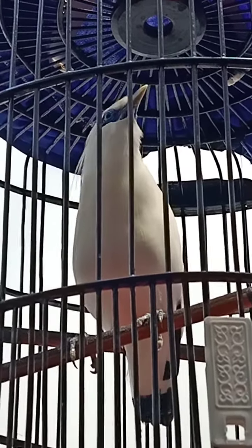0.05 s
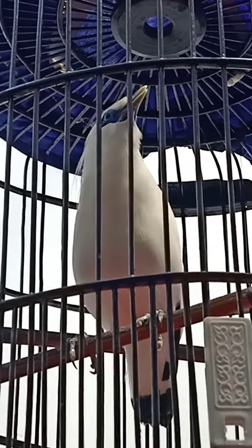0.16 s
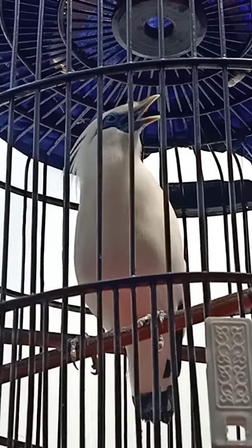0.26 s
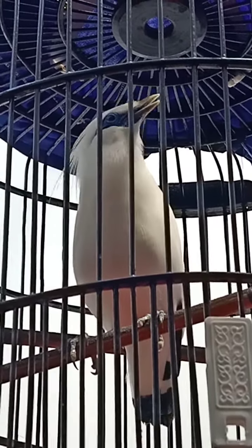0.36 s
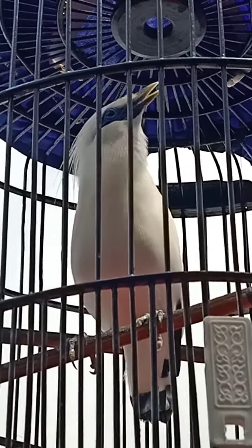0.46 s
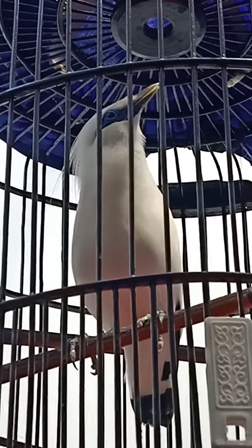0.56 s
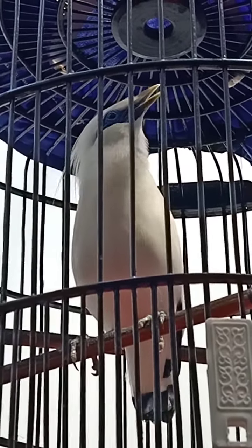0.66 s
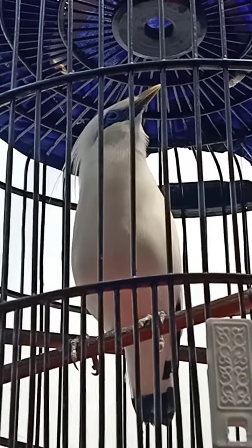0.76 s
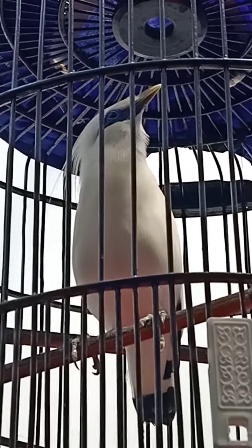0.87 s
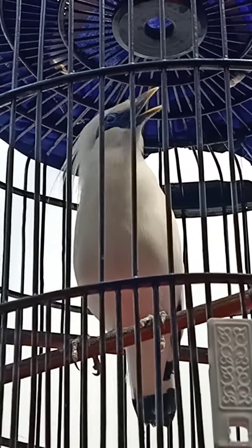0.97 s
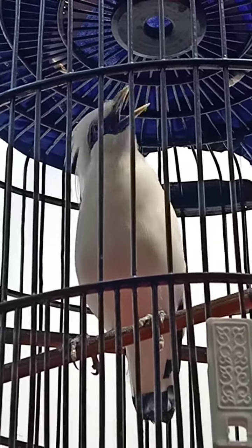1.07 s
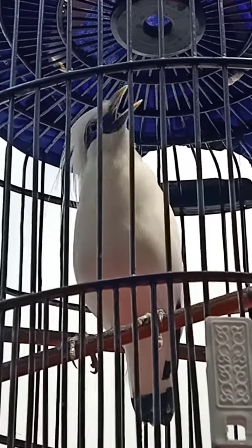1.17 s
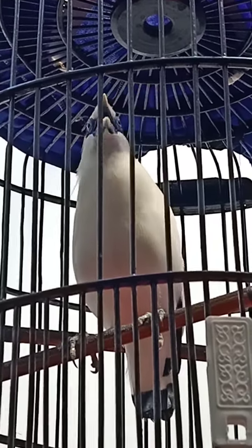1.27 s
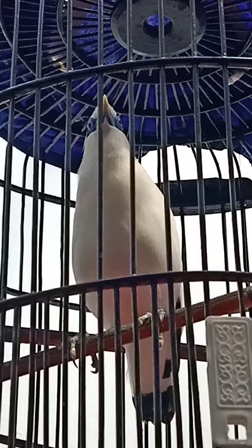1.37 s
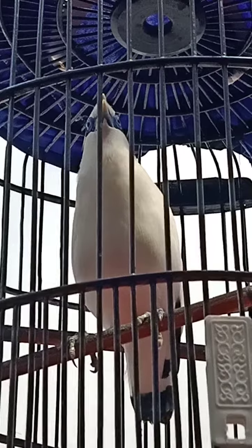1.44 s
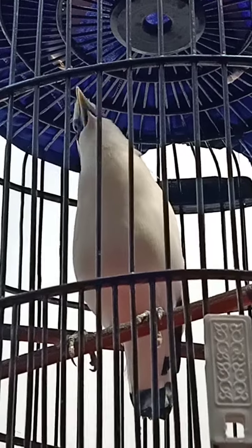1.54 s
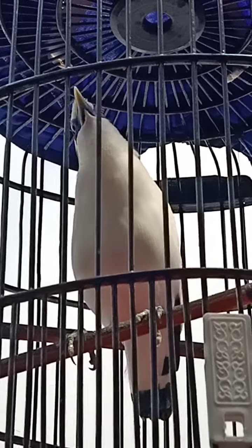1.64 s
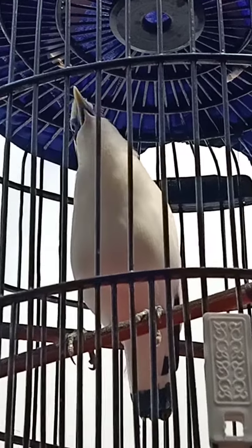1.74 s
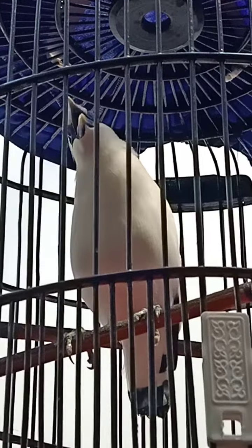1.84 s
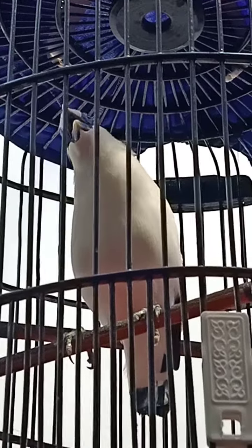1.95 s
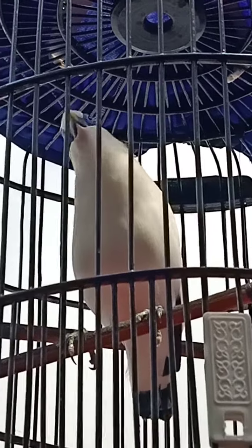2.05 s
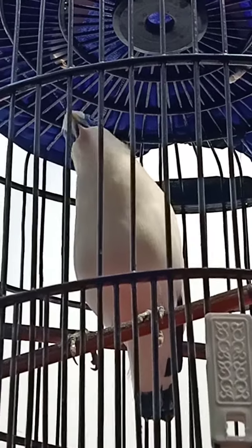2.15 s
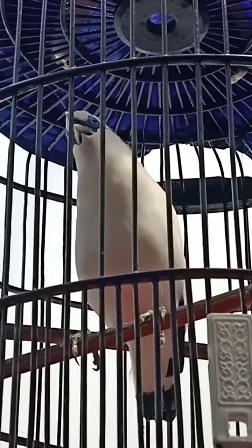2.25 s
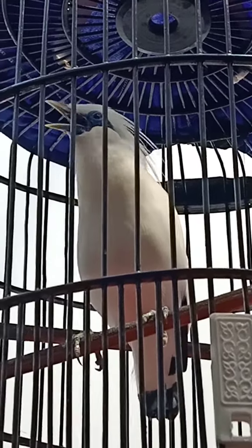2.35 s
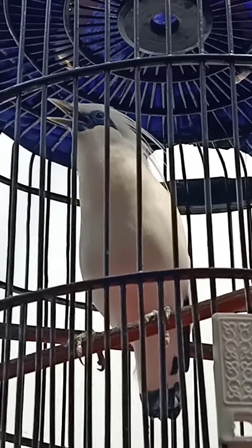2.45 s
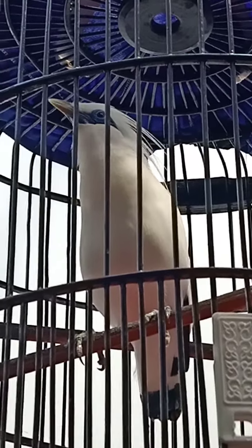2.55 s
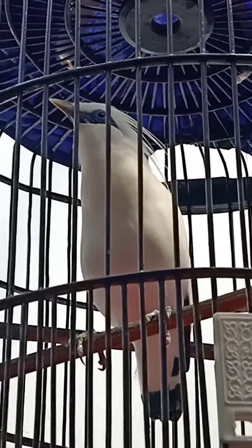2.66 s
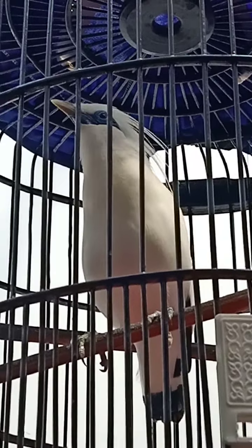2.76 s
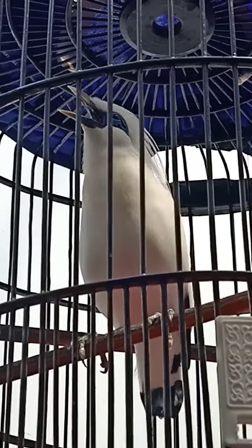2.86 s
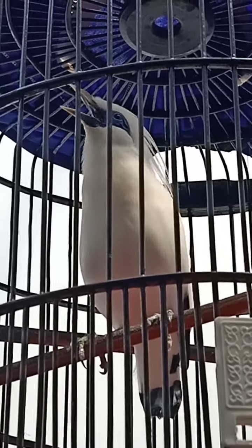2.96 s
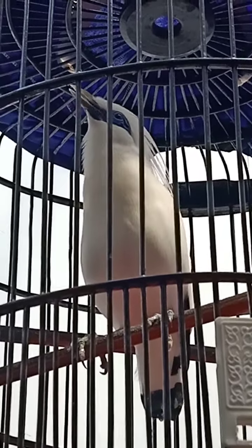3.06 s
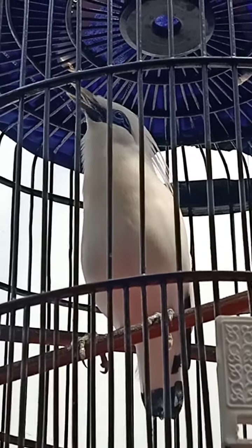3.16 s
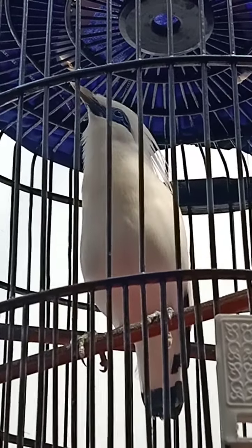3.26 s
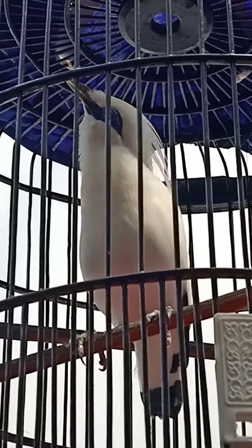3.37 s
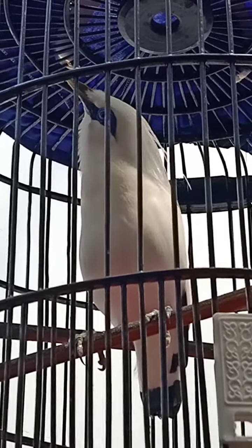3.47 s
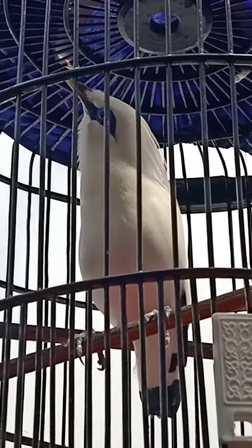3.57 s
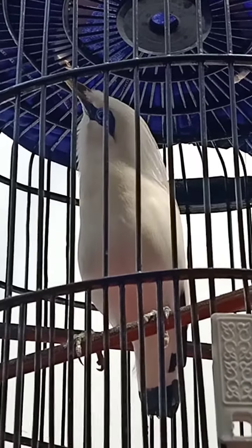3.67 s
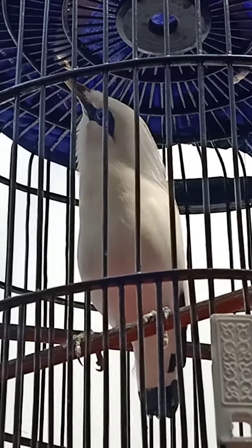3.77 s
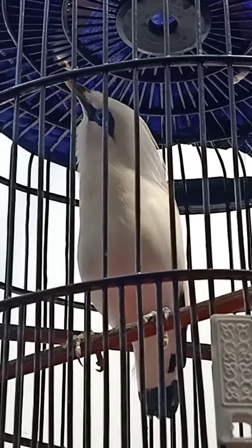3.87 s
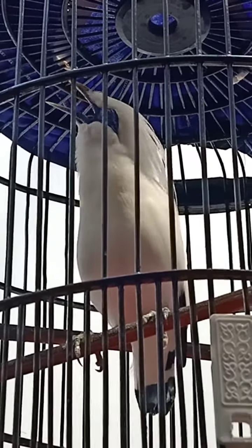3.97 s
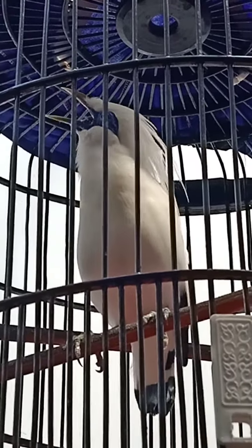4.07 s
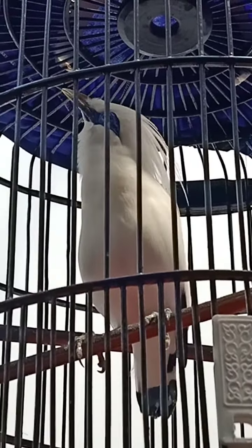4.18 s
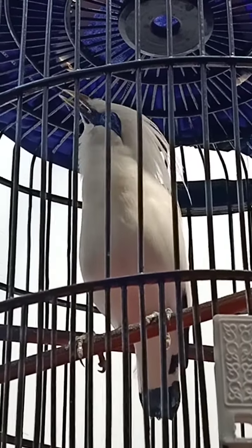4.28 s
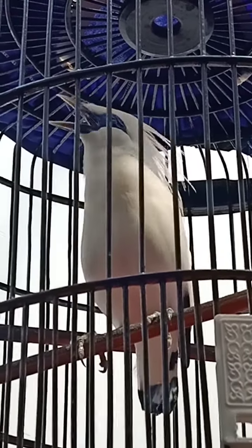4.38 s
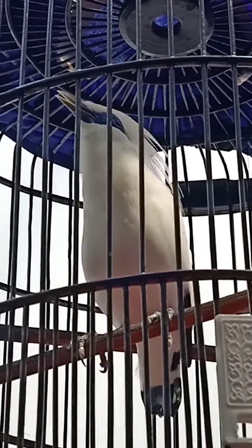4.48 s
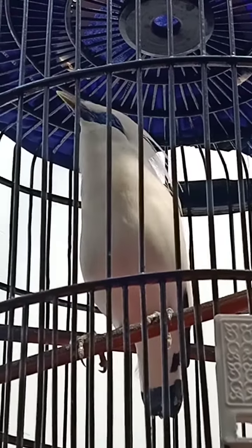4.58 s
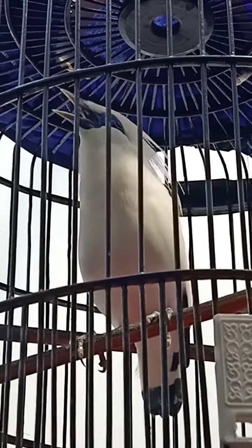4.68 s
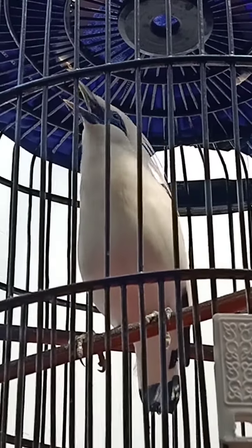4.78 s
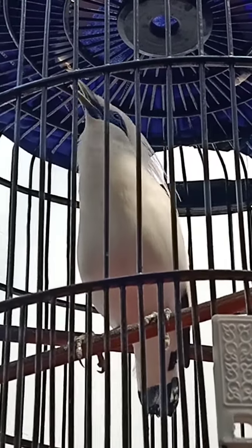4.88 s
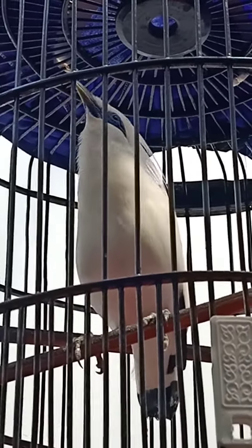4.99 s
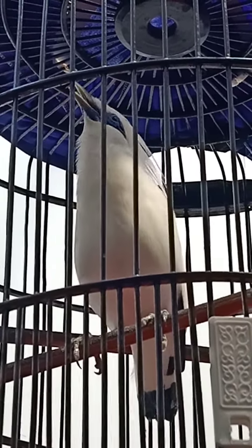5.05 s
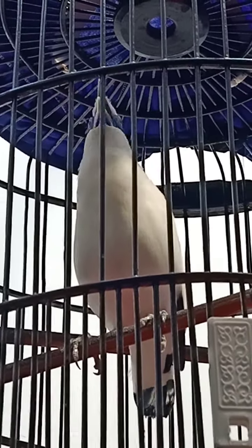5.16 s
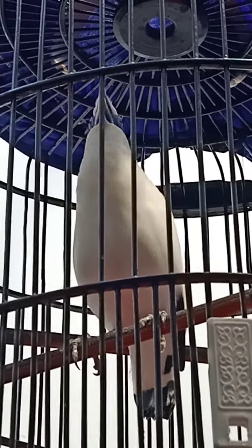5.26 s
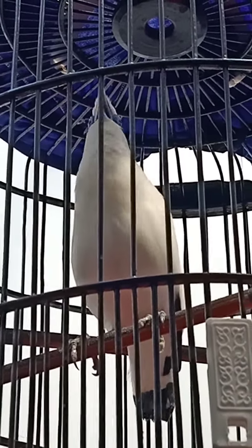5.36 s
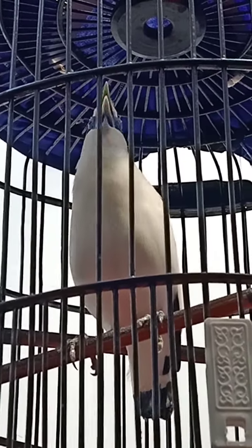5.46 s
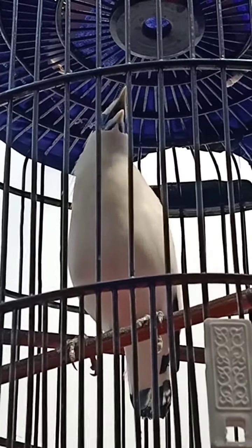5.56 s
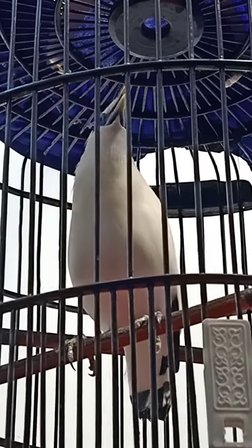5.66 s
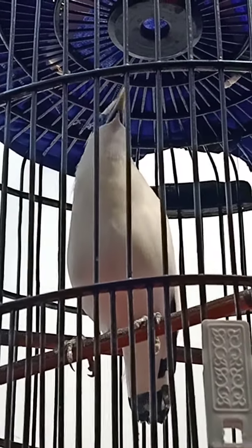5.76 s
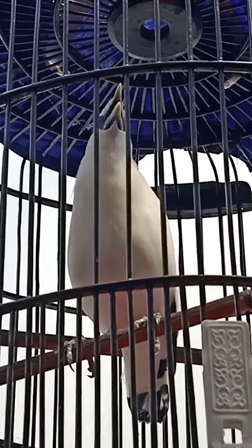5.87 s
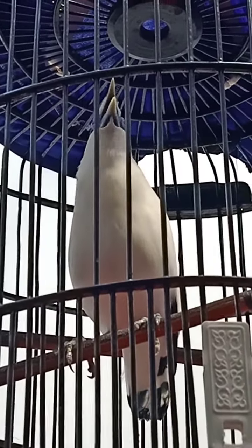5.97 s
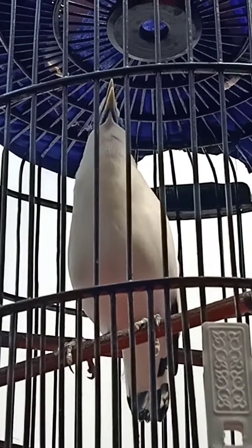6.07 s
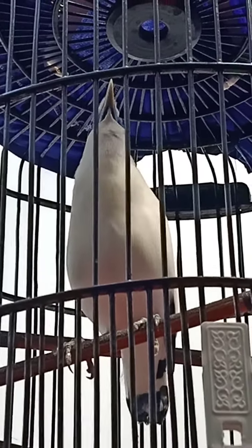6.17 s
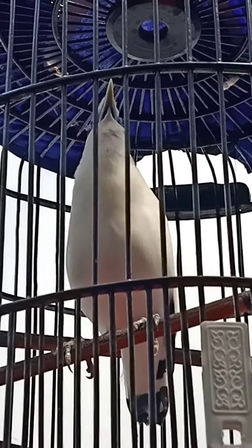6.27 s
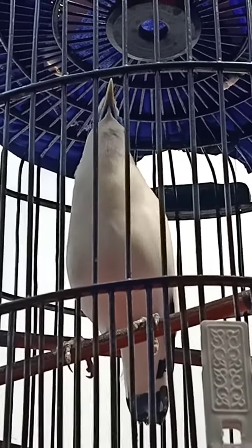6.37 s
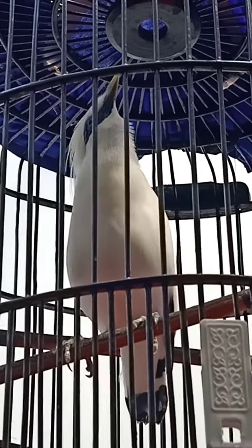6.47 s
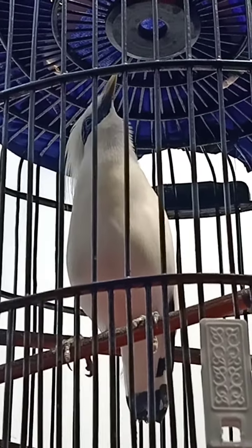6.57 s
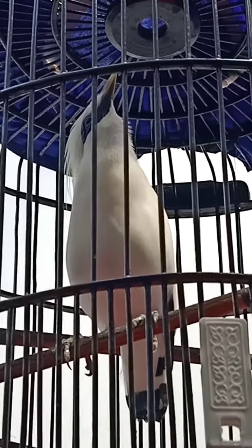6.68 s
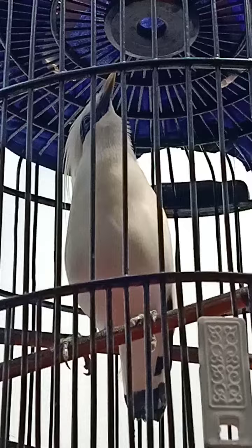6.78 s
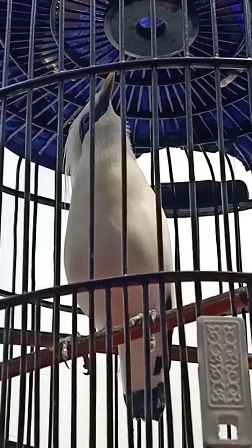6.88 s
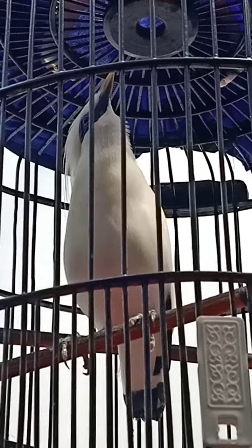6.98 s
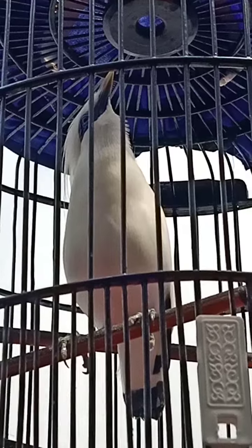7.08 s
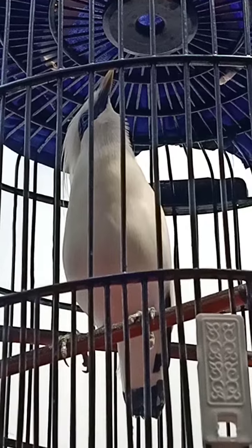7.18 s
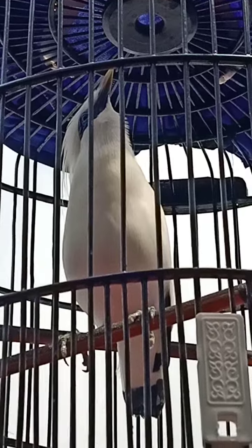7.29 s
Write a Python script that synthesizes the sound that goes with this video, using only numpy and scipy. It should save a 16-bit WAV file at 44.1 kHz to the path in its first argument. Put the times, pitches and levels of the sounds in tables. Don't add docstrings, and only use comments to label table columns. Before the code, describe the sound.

A caged myna close by whistles and buzzes in sweeping calls, then rapidly repeats one phrase, while another bird chips behind over faint town wash.

```python
import sys
import numpy as np
from scipy import signal
from scipy.fft import rfft, irfft, next_fast_len
from scipy.io import wavfile
from scipy.ndimage import uniform_filter1d, minimum_filter1d

SR = 44100
rng = np.random.default_rng(int(sys.argv[2]) if len(sys.argv) > 2 else 0)


def dump_mix(stems):
    frames = np.atleast_2d(stems).T
    limited = np.clip(frames, -1, 1)
    pcm = np.round(limited * 32767).astype(np.int16)
    wavfile.write(sys.argv[1], SR, pcm)


def voltage_ratio(decibels):
    exponent = np.asarray(decibels, float) / 20
    return 10 ** exponent


N = 323253

# (start [s], register break [s], held lower pitch [Hz],
# held upper pitch [Hz], top of the tail [Hz])
RUN = [
    (4.322, 4.439, 3417, 5380, 3012),
    (4.695, 4.858, 3130, 5010, 2727),
    (5.101, 5.243, 3050, 5076, 2747),
    (5.468, 5.635, 3097, 5136, 2796),
    (5.874, 6.039, 2980, 5130, 2838),
]


def evened(x):
    return x / np.sqrt(np.mean(abs(x) ** 2) + 1e-20)


def read(points, hz):
    f, value = np.transpose(points)
    return np.interp(np.log(hz + 1), np.log(f + 1), value)


def colour(x, points, share=1):
    size = next_fast_len(N)
    gain = voltage_ratio(share * read(points, np.fft.rfftfreq(size, 1 / SR)))
    return irfft(rfft(x, size) * gain, size)[..., :N]


def add(mix, s, sound):
    part = mix[max(round(s * SR), 0):][:len(sound)]
    part += sound[:len(part)]


def flutter(width_hz):
    r = np.exp(-np.pi * width_hz / SR)
    z = rng.standard_normal(N) + 1j * rng.standard_normal(N)
    return evened(signal.lfilter([1], np.poly([r, r, r]), z))


def town():
    # (frequency [Hz], density [dB per Hz])
    wash_colour = [(35, -30), (60, -12), (96, -13), (167, -15), (385, -11.5), (423, -16), (585, -2),
                   (1200, -1), (1480, -4.5), (2650, -1.5), (4220, -16.5), (5450, -19.5), (7370, -17),
                   (10700, -22.5), (15500, -77)]
    # (time [s], level [dB])
    wash_level = [(0.0, -48.5), (0.55, -52), (3.78, -45.5), (5.06, -54), (7.33, -49.5)]
    # (frequency [Hz], correlation [-1 to 1])
    likeness = [(60, 0.84), (130, 1), (290, 0.88), (640, -0.14), (1410, -0.22), (3100, 0.045),
                (6820, -0.081), (15000, 0.2)]
    # (frequency [Hz], width [Hz], level [dB])
    drones = [(99, 5.8, -3.5), (49, 7.1, 11), (136, 7.6, 11), (1109, 15.7, 21.5), (1471, 105, 11),
              (2080, 34, 11.5), (2980, 30, 11.5), (4140, 62, 14), (7100, 320, 8)]
    # (frequency [Hz], level [dB])
    mains = [(49.5, -31), (100, -31)]

    frames, hz = N // 512 + 5, np.fft.rfftfreq(2048, 1 / SR)
    a, b, c, d, patches = rng.standard_normal((frames, 1025, 5)).T
    patches = evened(uniform_filter1d(uniform_filter1d(patches, 16, 0), 8, 1))
    same = np.clip(read(likeness, hz), -1, 1)[:, None]
    left, apart = a + 1j * b, c + 1j * d
    z = np.array([left, same * left + np.sqrt(1 - same ** 2) * apart])
    humps_db = sum(db / (1 + (2 * (hz - f) / width) ** 2) for f, width, db in drones)
    z *= voltage_ratio((read(wash_colour, hz) + humps_db)[:, None] + 1.7 * patches)
    z[:, hz > 11600] *= voltage_ratio(-0.5)
    wash = evened(signal.istft(z, nperseg=2048, noverlap=1536)[1][:, :N])
    t = np.arange(N) / SR
    hum = sum(voltage_ratio(db) * np.sin(2 * np.pi * f * t) for f, db in mains)
    return voltage_ratio(np.interp(t, *np.transpose(wash_level)) + 9) * (wash + hum)


def motor():
    # (time [s], pitch [Hz], level [dB])
    course = [
        (0, 628.5, -56.5),
        (.5, 651, -53.5),
        (0.952, 648, -59),
    ]
    s, hz, db = np.transpose(course)
    t = np.arange(N) / SR
    turn = np.exp(2j * np.pi * np.cumsum(np.interp(t, s, hz)) / SR)
    wavering = (turn * (1 + .35 * flutter(width_hz=15))).real
    return voltage_ratio(np.interp(t, s, db)) * (t < s[-1]) * wavering


def run_note(shape, start, break_s, top_hz, held_db, break_db):
    stretch_from_s, stretch_to_s, usual_break_s = .035, .145, .165
    s, hz, db = np.transpose(shape)
    held = np.clip((s - stretch_from_s) / (stretch_to_s - stretch_from_s), 0, 1)
    before = s <= stretch_to_s
    if before.any():
        hz = hz * (top_hz / hz[before][-1]) ** (held ** 0.536 * before)
    else:
        hz = hz * top_hz / hz.max()
    s = start + s + held * (break_s - start - usual_break_s)
    return np.transpose([s, hz, db + np.where(before, held_db, break_db)])


def song():
    # (time [s], pitch [Hz], level [dB])
    lower_opening = [
        [(0, 3570, -15.5), (0.03, 3684, -44.5), (0.06, 3670, -43)],
        [(0.228, 3600, -19.5), (0.245, 3895, -18), (0.285, 4042, -18.5), (0.291, 3450, -19.5),
         (0.302, 2570, -23.5), (0.314, 2020, -30)],
        [(0.39, 1306, -35.5), (0.41, 1955, -47), (0.416, 2543, -10.5), (0.425, 2866, -23.5),
         (0.44, 2860, -18.5), (0.47, 2783, -17.5), (0.485, 2526, -22), (0.51, 1914, -31), (0.54, 1660, -39)],
        [(0.62, 2080, -36), (0.65, 2385, -23.5), (0.69, 2320, -26.5), (0.71, 2160, -22), (0.735, 1940, -49)],
        [(0.995, 1956, -35.5), (1.009, 2550, -24.5), (1.02, 2790, -37.5), (1.045, 2570, -32), (1.07, 2780, -40),
         (1.09, 3040, -57)],
        [(1.21, 2120, -39), (1.222, 2578, -30), (1.24, 2510, -36), (1.26, 2814, -41), (1.285, 2640, -54)],
        [(1.457, 2500, -34.5), (1.472, 2465, -20), (1.492, 2297, -24.5), (1.512, 2120, -26.5),
         (1.54, 1910, -30.5), (1.562, 2225, -20), (1.582, 2345, -29), (1.612, 2315, -28.5)],
    ]
    # (time [s], pitch [Hz], level [dB])
    lower_middle = [
        [(1.81, 2513, -31.5), (1.845, 2815, -47), (1.85, 2822, -29), (1.885, 2782, -30), (1.92, 3180, -39.5),
         (1.962, 3207, -30.5), (1.975, 3620, -29.5), (1.981, 4280, -20.5), (1.987, 5000, -36)],
        [(2.34, 1625, -43.5), (2.39, 2280, -24), (2.405, 2500, -4.5), (2.43, 2525, -21.5), (2.458, 2512, -15.5),
         (2.48, 2473, -25), (2.5, 2298, -16), (2.54, 2130, -24), (2.56, 1980, -48)],
        [(2.889, 5070, -26), (2.897, 4360, -15.5), (2.915, 3997, -15.5), (2.945, 3647, -17.5),
         (2.99, 3523, -23.5), (3.03, 3500, -26), (3.062, 3450, -21.5), (3.072, 3410, -33)],
        [(3.115, 3870, -32), (3.126, 2817, -19), (3.14, 2701, -42), (3.15, 2794, -13.5), (3.162, 2780, -31),
         (3.178, 2774, -16.5), (3.193, 2724, -21), (3.203, 2824, -48), (3.217, 2620, -36)],
        [(1.835, 3426, -25), (1.85, 3955, -34), (1.9, 3690, -51), (1.94, 3600, -36)],
    ]
    # (time [s], pitch [Hz], level [dB])
    lower_lead = [
        [(3.962, 1405, -31), (3.973, 2060, -28.5), (3.978, 2546, -12), (3.988, 2924, -16), (4.01, 3223, -19.5),
         (4.045, 3506, -18), (4.088, 3522, -17.5), (4.094, 2840, -24.5), (4.1, 2330, -31)],
        [(4.117, 2280, -31), (4.128, 2537, -8), (4.145, 2540, -22.5), (4.165, 2636, -27), (4.2, 2230, -28.5)],
    ]
    # (time [s], pitch [Hz], level [dB])
    upper_calls = [
        [(0.218, 2510, -33.5), (0.228, 2697, -26.5), (0.24, 2900, -42.5), (0.26, 2750, -33.5)],
        [(1.0, 4410, -37.5), (1.025, 4384, -17.5), (1.036, 4560, -28.5), (1.047, 5100, -21.5),
         (1.06, 5780, -26.5), (1.085, 5980, -24), (1.1, 6390, -25), (1.115, 6630, -38.5)],
        [(1.225, 3820, -27), (1.233, 4530, -23), (1.241, 5580, -25), (1.27, 5640, -20.5), (1.288, 6060, -32),
         (1.3, 6240, -24), (1.315, 6400, -40)],
        [(1.82, 6030, -37.5), (1.85, 6800, -37), (1.88, 6330, -30), (1.905, 6330, -20), (1.93, 6340, -19),
         (1.97, 6630, -21.5), (1.99, 6340, -48)],
        [(2.14, 3470, -51), (2.16, 4100, -39.5), (2.2, 4630, -48), (2.265, 4480, -41)],
        [(2.27, 3500, -44), (2.285, 3740, -39), (2.297, 3880, -39)],
        [(2.298, 2500, -26), (2.313, 2577, -15), (2.335, 2757, -32.5), (2.352, 2760, -23), (2.39, 2620, -42.5)],
        [(2.863, 3950, -39), (2.87, 4050, -26), (2.886, 4500, -37)],
        [(2.862, 5230, -54), (2.872, 5650, -29.5), (2.884, 5260, -40)],
        [(1.845, 5720, -39), (1.875, 5330, -36), (1.93, 5800, -62.5)],
        [(2.876, 3640, -48.5), (2.89, 3210, -29), (2.905, 2590, -34)],
    ]
    # (time [s], pitch [Hz], level [dB])
    upper_lead = [
        [(3.945, 2400, -39), (3.956, 2540, -21), (3.966, 3130, -30.5), (3.979, 4720, -24)],
        [(3.99, 3725, -44), (4.008, 5000, -33), (4.035, 5610, -39), (4.065, 5780, -40.5), (4.09, 5780, -29),
         (4.093, 4770, -25.5), (4.098, 3900, -16.5), (4.11, 3440, -29.5), (4.127, 3006, -14)],
    ]
    # (time after the start [s], pitch [Hz], level [dB])
    pip_shape = [(-.004, 2414, -49.5), (.003, 2514, -22), (.009, 2700, -34), (.016, 3600, -39.5),
                 (.026, 4730, -47)]
    held_low = [(.012, 1707, -47.5), (.024, 2626, -27.5), (.033, 2942, -22), (.065, 3095, -27),
                (.12, 3020, -34), (.145, 3100, -26.5), (.16, 3580, -32), (.166, 2990, -33),
                (.174, 2350, -31)]
    held_high = [(.033, 3842, -42), (.045, 4852, -43), (.075, 5034, -28), (.12, 5095, -26.5),
                 (.158, 5090, -28.5), (.164, 4600, -37), (.169, 3750, -23), (.177, 3335, -20.5),
                 (.186, 3250, -27.5)]
    tail_shape = [(.186, 2595, -22.5), (.192, 2565, -20.5), (.205, 2816, -19.5), (.218, 2695, -18),
                  (.233, 2400, -18.5), (.258, 2223, -45.5)]
    # (pip [dB], held lower [dB], held upper [dB], break [dB], tail [dB])
    efforts = [(3, -0.5, -9, 5.5, 0), (1, 0.5, 6.5, 5.5, 1), (-2.5, 1.5, 4, 3.1, 0.2), (0, 0, 4.5, 1, -0.5),
               (8.5, 2.5, -7, 3, -0.4)]

    lower = lower_opening + lower_middle + lower_lead
    upper = upper_calls + upper_lead
    for phrase, effort in zip(RUN, efforts):
        start, break_s, low_hz, high_hz, tail_hz = phrase
        pip, low, high, snap, tail = effort
        lower += [run_note(held_low, start, break_s, low_hz, low, snap),
                  run_note(tail_shape, start, break_s, tail_hz, tail, tail)]
        upper += [run_note(pip_shape, start, break_s, pip_shape[-1][1], pip, pip),
                  run_note(held_high, start, break_s, high_hz, high, snap)]
    return lower, upper


def repeated(values, first=0):
    opening = [v + first for v in values[-2:]]
    return values[:-2] + opening + values[-2:] * (len(RUN) - 1)


def syrinx_side(notes, roughness, edges_db, airs_db, warbles, flutter_hz):
    tone, (rough, edge, air) = np.zeros(N, complex), np.zeros((3, N))
    warble = {round(k): (depth_hz, per_s) for k, depth_hz, per_s in warbles}
    unsteady = .7 * flutter(width_hz=40).real
    for k, rows in enumerate(notes):
        s, *columns = np.transpose(rows)
        t = np.arange(s[0], s[-1], 1 / SR)
        hz, db = (np.interp(t, s, c) for c in columns)
        glide = uniform_filter1d(abs(np.gradient(hz, t)), 300) / 700000.0
        depth_hz, per_s = warble.get(k, (0, 0))
        hz = hz + depth_hz * np.cos(2 * np.pi * per_s * (t - s[0]) + unsteady[:len(t)])
        fade = np.clip(np.minimum(t - s[0], s[-1] - t) / 0.0013, 0, 1)
        add(tone, s[0], np.sqrt(2) * voltage_ratio(db) * fade * np.exp(2j * np.pi * np.cumsum(hz) / SR))
        add(rough, s[0], roughness[k] + .2 * glide)
        add(air, s[0], voltage_ratio(airs_db[k]) + .65 * glide)
        add(edge, s[0], voltage_ratio(edges_db[k]) / (1 + 18 * glide))
    rough = np.clip(rough, 0, 1)
    scattered = np.sqrt(1 - rough ** 2) + rough * flutter(flutter_hz)
    return tone * scattered, air * abs(tone), edge


def myna():
    lower_rough = [.4, .18, .15, .1, .55, .45, .5, .18, .12, .1, .3, .25, .36, .48, .1, .16]
    upper_rough = [.5, .45, .35, .55, .1, .2, .4, .2, .2, .3, .2, .25, .2, .3, .08]
    first_hoarse = (.3, .3)
    lower_edge_db = [-10, -10.5, -10.5, -25, 2.5, -15, -25, 1, -21, -6.5, -12, -18, 2, -7, 6.5, -6]
    upper_edge_db = [-8, 7, 9.5, -32, 7, 13, -22, 1, -16, -27, -1, -12, 7.5, -21, 0.5]
    lower_air_db = [-21, -27.5, -48, -31.5, -4, -4.5, -26, -3.5, -58.5, -23.5, -40, -9, -22.5, -36]
    upper_air_db = [-5.5, -8, -18, -24, -16, -13, -25, -14, -20, -14, -12, -18.5, -16]
    # (pip [dB], held [dB])
    run_air_db = ([-36, -30], [-30, -28])
    # (note number, depth [Hz], rate [warbles per s])
    warbled = [(6, 190, 62), (10, 284, 49)]
    # (multiple of lower, multiple of upper), and their levels [dB]
    orders = [(2, 0), (3, 0), (4, 0), (0, 2), (0, 3), (1, 1), (2, 1), (1, 2), (-1, 1), (-2, 2), (3, 1)]
    orders_db = [-11, -34, -48, -29.5, -31, -17.5, -38, -29.5, -31.5, -24.5, -32]
    # (frequency [Hz], density [dB per Hz])
    rasp_colour = [(900, -22.5), (1650, -17), (2760, -2), (5000, -18), (6300, -2), (7400, -7.5),
                   (10000, -22.5), (11500, -26.5), (13200, -28.5), (15500, -42)]
    # (frequency [Hz], gain [dB])
    beak = [(1400, 1.5), (2000, 3), (2400, -0.5), (2650, 2.5), (2950, 0.5), (3500, -2.1), (4500, -6.8),
            (6500, 0.3)]
    # (frequency [Hz], gain [dB])
    tract = [(1500, -0.5), (4500, -5), (5500, -20), (6200, -14), (7200, -3), (8500, -0.5), (10000, 3),
             (12000, -12), (15000, -12.5)]

    lower, upper = song()
    low, low_leak, low_edge = syrinx_side(
        lower, repeated(lower_rough, first_hoarse[0]), repeated(lower_edge_db),
        repeated(lower_air_db + run_air_db[0], 5.7), warbled, flutter_hz=800)
    high, high_leak, high_edge = syrinx_side(
        upper, repeated(upper_rough, first_hoarse[1]), repeated(upper_edge_db),
        repeated(upper_air_db + run_air_db[1], 0.5), [], flutter_hz=1000)
    overtones = np.zeros(N)
    low_turn = low / (abs(low) + 1e-9)
    high_turn = high / (abs(high) + 1e-9)
    for (m, n), db in zip(orders, orders_db):
        product = abs(low * low_edge) ** abs(m) * abs(high * high_edge) ** n
        size = product ** (1 / (abs(m) + n))
        low_part = low_turn ** m if m >= 0 else np.conj(low_turn) ** -m
        overtones += (voltage_ratio(db) * size * low_part * high_turn ** n).real
    air = rng.standard_normal(N)
    rasp = voltage_ratio(-7) * (low_leak + high_leak) * evened(colour(air, rasp_colour))
    overtones *= 1 + .55 * evened(uniform_filter1d(air, size=120))
    return colour((low + high).real, beak) + colour(overtones, tract) + rasp


def far_bird():
    # (time [s], peak level [dB])
    chips = [(0.0907, -41.5), (0.192, -35), (0.494, -44.5), (0.5921, -41.5), (0.6972, -43.5), (0.7976, -42),
             (0.9034, -37.5), (1.3155, -37), (1.4119, -38.5), (1.522, -38.5), (1.6137, -37.5), (1.716, -36),
             (2.1135, -32.5), (2.203, -35.5), (2.305, -35.5), (2.4114, -44), (2.503, -41.5), (2.601, -40.5),
             (2.7084, -37), (2.8155, -39.5), (3.0638, -34), (3.2044, -37), (3.3345, -33.5), (3.477, -32),
             (3.6418, -34.5), (3.8007, -33), (3.9386, -33), (4.246, -41.5)]
    # (frequency [Hz], width [Hz], level [dB])
    throat = [(2500, 150, 3.5), (3063, 2850, -4.5), (4370, 440, -11.5), (5000, 170, -13), (6970, 1300, -11)]
    rise_s, decay_s = .0045, .023
    out, t = np.zeros(N), np.arange(2600) / SR
    envelope = np.minimum(t / rise_s, 1) * np.exp(-(t / decay_s) ** 2)
    breath = [voltage_ratio(db) * flutter(width_hz) for hz, width_hz, db in throat]
    for s, db in chips:
        at = slice(round(s * SR), round(s * SR) + len(t))
        bands = sum(b[at] * np.exp(2j * np.pi * f * t) for b, (f, *_) in zip(breath, throat))
        add(out, s - .003, voltage_ratio(db) * bands.real * envelope)
    return out


def yard(x, wet_db):
    # (frequency [Hz], reverberation time t60 [s])
    dying = [(1000, 0.21), (2500, 0.39), (5000, 0.34), (10000, 0.38)]
    # (delay [s], gain)
    early = [
        [(.0021, 1), (.0057, -0.98), (.0112, 0.12), (.0183, 0.13)],
        [(.0016, -1.3), (.0049, 0.36), (.0127, -0.04), (.0204, -0.08)],
    ]
    taps = np.zeros((2, SR))
    at = np.arange(300, SR - 20, 20) + rng.integers(0, 20, (2, (SR - 301) // 20))
    np.put_along_axis(taps, at, rng.choice([-1., 1.], at.shape), 1)
    hz, t, z = signal.stft(taps, SR, nperseg=256)
    tail = signal.istft(z * voltage_ratio(-60 * t / read(dying, hz)[:, None]), SR, nperseg=256)[1]
    tail = voltage_ratio(wet_db) * tail / np.linalg.norm(tail[0])
    tail[[0, 1], [0, 17]] += 1
    for port, echoes in zip(tail, early):
        for s, gain in echoes:
            add(port, s, np.array([gain]))
    return signal.fftconvolve(x[None], tail, axes=1)[:, :N]


def scene():
    background = town() + motor()
    return background + voltage_ratio(-2.5) * yard(myna(), wet_db=3) + yard(far_bird(), wet_db=-0.5)


def roll_off(x):
    return signal.sosfilt(signal.butter(12, 15500, fs=SR, output="sos"), x)


def record(dry):
    # (frequency [Hz], gain [dB])
    port_colour = [(60, 4.5), (95, -2.5), (150, 2), (240, 0.5), (380, 1.5), (600, 1), (950, 2), (1500, 5.5),
                   (2380, 4.5), (3770, 5), (5980, 7.5), (9470, -3), (15000, 0)]
    ceiling = .88
    ports = np.array([colour(dry[0], port_colour, 0.43), colour(dry[1], port_colour, -0.9)])
    peak = -minimum_filter1d(-abs(ports).max(0), size=257)
    ports = ports / uniform_filter1d(np.maximum(peak / ceiling, 1), size=129)
    return roll_off(ports)


dry = scene()
out = record(dry)
dump_mix(out)
```